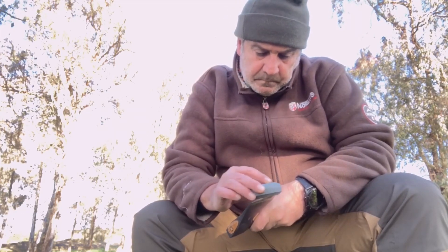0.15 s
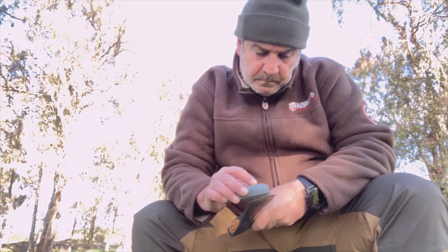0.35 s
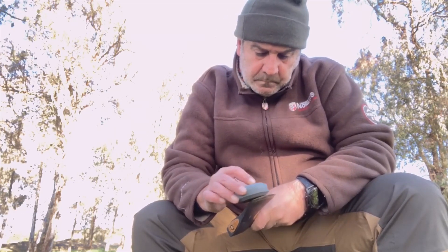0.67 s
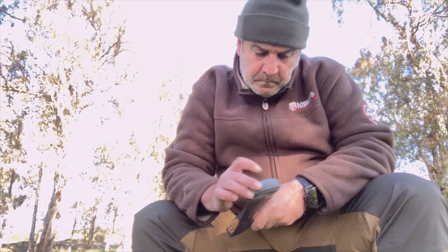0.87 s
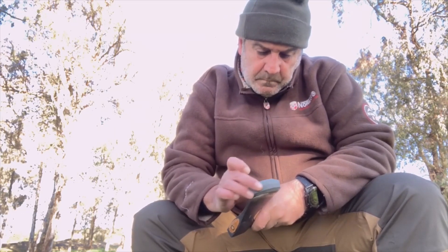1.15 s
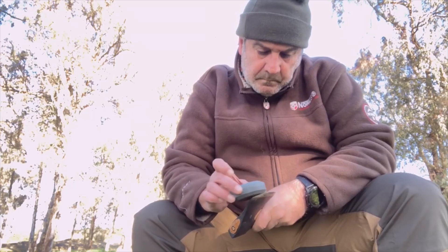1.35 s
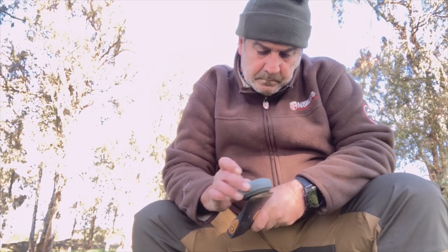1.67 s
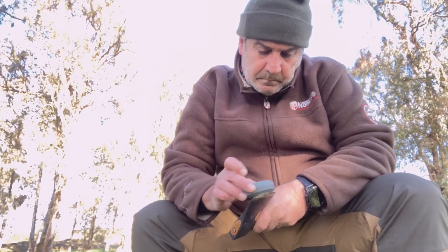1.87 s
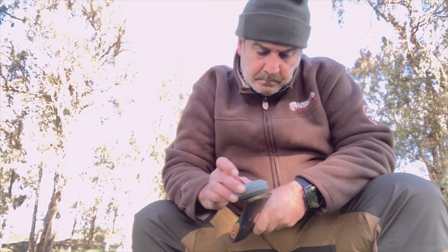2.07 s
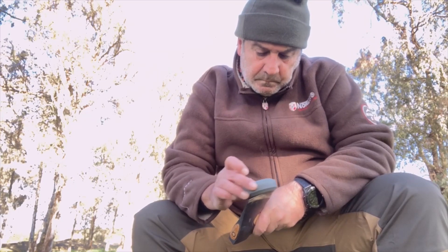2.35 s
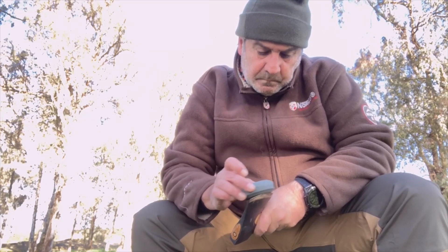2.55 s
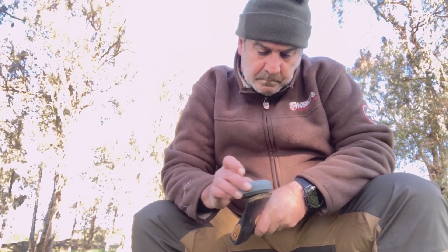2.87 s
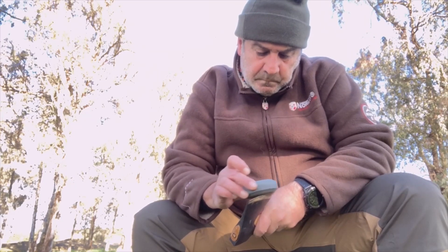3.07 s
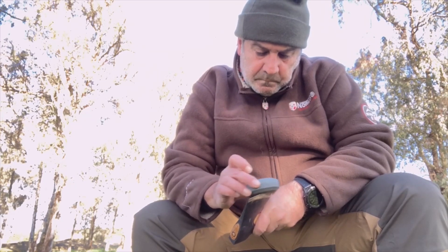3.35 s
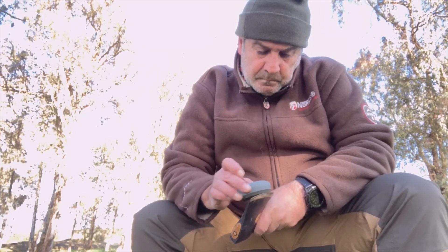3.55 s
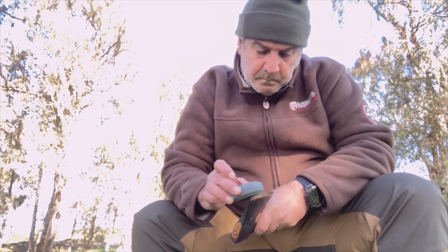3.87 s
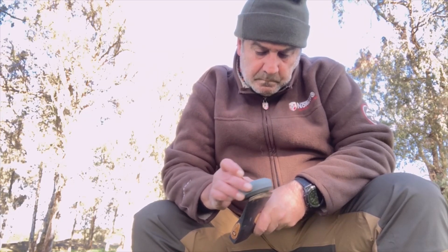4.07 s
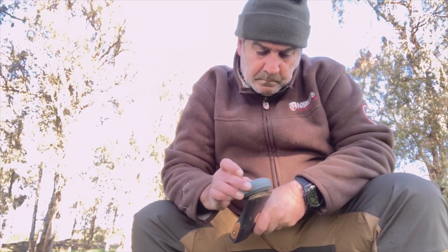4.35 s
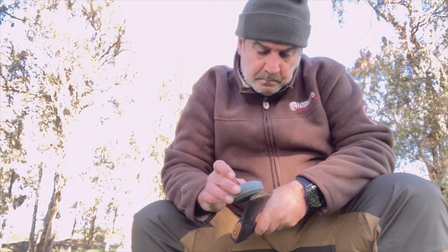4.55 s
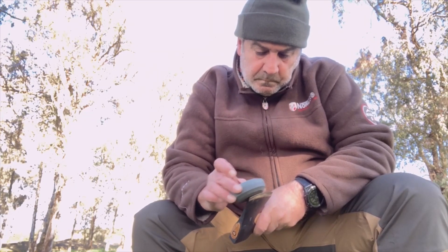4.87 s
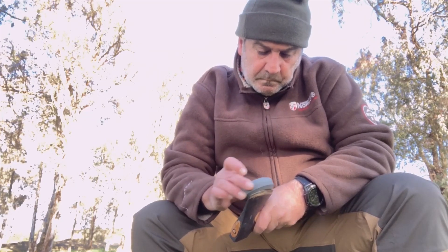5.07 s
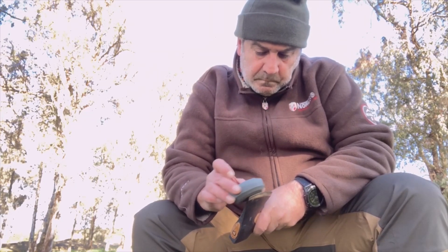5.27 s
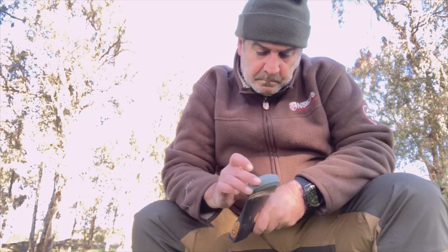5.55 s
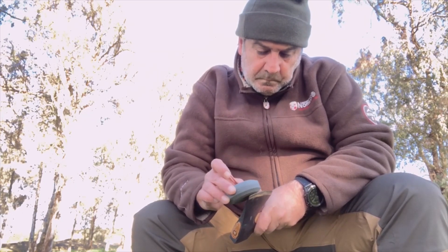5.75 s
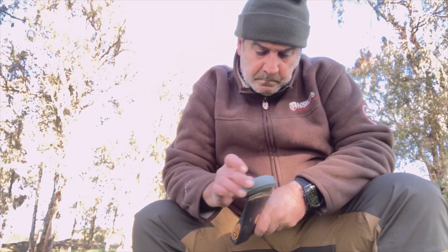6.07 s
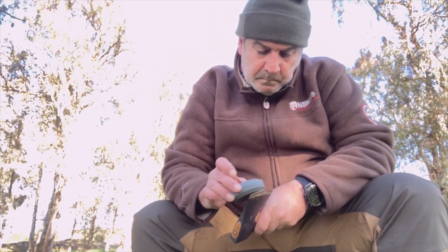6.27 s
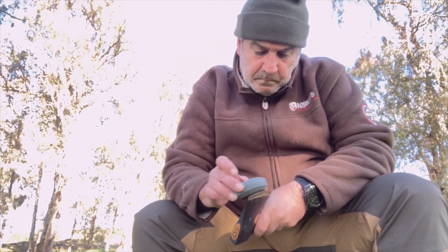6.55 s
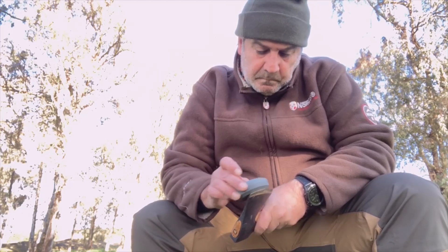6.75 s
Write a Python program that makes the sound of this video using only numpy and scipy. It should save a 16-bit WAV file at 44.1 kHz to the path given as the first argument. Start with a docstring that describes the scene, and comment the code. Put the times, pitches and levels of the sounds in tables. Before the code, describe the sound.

A gritty stone rasps in short, firm circular strokes along a hand-held steel axe blade, with lighter chattering returns, small squeals and faint outdoor wind.

```python
"""A firm gritty rasp comes first: a round stone is worked in circles along an axe blade held on the knee.
Looser returns follow the firm pushes, with creaks, squeals, ticking grains and a little outdoor wind.
Random grit forces catch and slip, and shake resonances of the hand-damped axe head, the stone and the edge.
Wind is coloured noise in puffs, with low bumps; left and right differ in level, phase and fine grain.
All dB levels are relative: each part may be trimmed afterwards, and the stereo stage colours the sum."""
import sys
import numpy as np
from scipy import signal
from scipy.fft import rfft, irfft, next_fast_len
from scipy.io import wavfile
from scipy.ndimage import uniform_filter1d

SR = 44100
rng = np.random.default_rng(int(sys.argv[2]) if len(sys.argv) > 2 else 0)


def unload_wav(signal):
    """Save mono or channel-first audio to the path in sys.argv[1] as 16-bit WAV at rate SR, clipped to [-1, 1]."""
    wavfile.write(
        sys.argv[1],
        SR,
        np.round(np.clip(np.atleast_2d(signal).T, -1, 1) * 32767).astype(np.int16),
    )


N = 304712
TIME = np.arange(N) / SR
STEPS = TIME[::64]  # coarse clock for slow levels


def from_db(db):
    """Turn decibels into gain."""
    return 10 ** (np.asarray(db) / 20)


def rms_one(x):
    """Scale to unit power."""
    return x / np.sqrt(np.mean(x ** 2) + 1e-20)


def over_time(rows, clock=TIME):
    """Join (time [s], value) points with straight lines."""
    s, value = np.transpose(rows)
    return np.interp(clock, s, value)


def at_hz(points, hz):
    """Read a (frequency [Hz], value) curve on a log-frequency axis."""
    f, value = np.transpose(points)
    return np.interp(np.log(hz + 1), np.log(f), value)


def drift(rate):
    """Random wandering of spread 1, with a new target rate times a second."""
    knots = rng.standard_normal(N // 16)
    return rms_one(np.interp(TIME * rate, np.arange(len(knots)), knots))


def coloured(spectrum):
    """Noise with a given spectrum, rms 1."""
    size = next_fast_len(N)
    gain = from_db(at_hz(spectrum, np.fft.rfftfreq(size, 1 / SR)))
    noise = rng.standard_normal(size)
    return rms_one(irfft(rfft(noise) * gain, size)[:N])


def ring(force, modes):
    """Hand-damped resonances side by side: each is a steep band filter shaken by the force."""
    out = 0
    for hz, width, db in modes:
        edges = np.clip([hz - width / 2, hz + width / 2], 20, .45 * SR)
        band = signal.butter(2, edges, "band", fs=SR, output="sos")
        out = out + from_db(db) * signal.sosfilt(band, force + 1e-18)
    return out


def moving_ring(force, hz, width):
    """One resonance whose centre follows a curve: shift it down to zero, low-pass, shift back."""
    turn = np.exp(2j * np.pi * np.cumsum(hz) / SR)
    damping = signal.butter(2, width / 2, fs=SR, output="sos")
    return 2 * np.real(turn * signal.sosfilt(damping, force * turn.conj() + 1e-18))


def at_level(x, db, span_s=0.0431):
    """Hold the short-term level at db while the fast grain stays."""
    power = uniform_filter1d(x * x, int(span_s * SR))
    power = uniform_filter1d(power, int(span_s * SR / 2))
    return from_db(db) * x / np.sqrt(np.abs(power) + 1e-12)


def together(*levels_db):
    """The level of several sounds added by power."""
    return 10 * np.log10(sum(from_db(db) ** 2 for db in levels_db) + 1e-20)


def swell(peak_s, half_s, db):
    """Level in dB of a smooth rise and fall."""
    return db + 20 * np.log10(np.exp(-((STEPS - peak_s) / half_s) ** 2) + 1e-9)


# puffs of wind on the microphone: (peak time [s], half length [s], level [dB])
GUSTS = [(0.056, 0.0304, -61.5), (0.288, 0.028, -65), (1.005, 0.0218, -55.5), (1.105, 0.04, -60.5),
         (1.263, 0.035, -63.5), (1.39, 0.0216, -62.5), (1.56, 0.0786, -48.5), (1.788, 0.102, -54.5),
         (2.499, 0.075, -63), (3.022, 0.014, -60), (3.641, 0.015, -62.5), (4.303, 0.022, -63),
         (5.228, 0.0182, -59.5), (5.417, 0.0213, -63.5), (6.76, 0.0156, -57.5)]
# breeze between the puffs, calmer overall towards the end: (time [s], level [dB])
BREEZE = [(0, -73), (3, -74.5), (6, -80.5), (6.91, -77)]
# spectrum of the wind: (frequency [Hz], level [dB per Hz])
WIND_COLOUR = [(20, -55.5), (38, 0), (55, 5.5), (80, 1), (120, -12.5), (180, -18.5), (300, -53.5)]
# spectrum of the still air: (frequency [Hz], level [dB per Hz])
AIR_COLOUR = [(20, -35), (60, -1.5), (170, -4), (260, -5), (500, -7.5), (1500, -10.5), (4000, -19.5),
              (8000, -53), (15000, -50)]


def outdoors():
    """Soft gusts are low noise shared by both channels, with separate eddies, over steady still-air noise."""
    puffs = [swell(*gust) for gust in GUSTS]
    puffs_db = np.interp(TIME, STEPS, together(*puffs))
    wind_db = together(puffs_db, over_time(BREEZE) + 2.9 * drift(18))
    gusts = at_level(coloured(WIND_COLOUR), wind_db + .5, span_s=0.049)
    eddies = from_db(wind_db - 7.0) * np.array([coloured(WIND_COLOUR), coloured(WIND_COLOUR)])
    separate_air = np.array([coloured(AIR_COLOUR), coloured(AIR_COLOUR)])
    air = coloured(AIR_COLOUR) + from_db(-0.5) * separate_air
    return gusts + eddies + from_db(-71.5) * air


# low bumps of wind on the microphone:
# (time [s], envelope peak [dB], final pitch [Hz], extra pitch at the start [Hz])
BUMPS = [(1.472, -40.5, 55.8, 31.6), (1.531, -45, 80, 24), (1.549, -47, 130, 60), (1.572, -39, 64, 46),
         (1.717, -47.5, 54.7, 34.6), (1.75, -49.5, 70, 30), (1.765, -48.5, 124, 36),
         (1.81, -42.5, 48.5, 37.6), (2.002, -49, 50.1, 35), (2.171, -44.5, 61.3, 105),
         (2.445, -50.5, 45, 24.6), (2.483, -53, 48, 18), (2.547, -47.5, 52, 29)]
BUMP_RISE_CYCLES, BUMP_SINK_S = 0.838, 0.0088


def bumps():
    """Each bump is a sinking sine that swells and dies within a few slow cycles."""
    out = np.zeros(N)
    for s, db, hz, sharp_hz in BUMPS:
        age = np.maximum(STEPS - s, 0)
        rise = age * hz / BUMP_RISE_CYCLES
        envelope = (rise * np.exp(1 - rise)) ** 2
        cycles = hz * age + sharp_hz * BUMP_SINK_S * (1 - np.exp(-age / BUMP_SINK_S))
        out += np.interp(TIME, STEPS, from_db(db) * envelope * np.sin(2 * np.pi * cycles))
    return out


# firm pushes: (start [s], length [s], rasp [dB], thrum [dB], bite on the bevel [dB], fizz [dB],
# weight gained from start to end [dB])
PUSHES = [(0.044, 0.1757, -46.5, -52.5, -58.5, -66, 5.5), (0.403, 0.149, -48.5, -57.5, -55, -63, -5),
          (0.767, 0.1245, -51.5, -59, -63, -75, -3.5), (1.106, 0.1325, -47.5, -54, -56, -67.5, 6.5),
          (1.496, 0.131, -45, -50, -55, -59.5, 1), (1.849, 0.1748, -42.5, -49.5, -56.5, -63.5, -4),
          (2.196, 0.1796, -44.5, -50, -55, -67, 3), (2.548, 0.1987, -43.5, -52, -51, -62, 3.5),
          (2.853, 0.233, -45.5, -50, -52, -61.5, -1.5), (3.193, 0.211, -44.5, -52.5, -54, -64.5, 4),
          (3.559, 0.1713, -42, -50.5, -54, -63.5, 1), (3.928, 0.15, -44, -52, -60, -67, 0),
          (4.303, 0.111, -49, -58.5, -68.5, -64.5, -1.5), (4.609, 0.183, -41.5, -51.5, -55, -66, 0),
          (5.036, 0.139, -44.5, -51, -57, -63, 5), (5.464, 0.1593, -45.5, -51, -55.5, -63, -4),
          (5.849, 0.2187, -43.5, -48, -55.5, -63, 2.5), (6.329, 0.1816, -42, -46.5, -55, -63, -5),
          (6.795, 0.175, -40.5, -49, -53, -61.5, 3.5)]


def pushing(turn_s=0.02, overrun_s=0.0328):
    """1 during a push, 0 otherwise, with soft changes between them."""
    firm = np.zeros(N)
    for start, length, *_ in PUSHES:
        firm += (TIME >= start) & (TIME < start + length + overrun_s)
    return np.clip(uniform_filter1d(firm, int(turn_s * SR)), 0, 1)


SET_DOWN_S = 0.029


def contact_hz(start_hz, end_hz, return_hz):
    """A resonance shifts quickly as the stone is set down and glides as the contact travels along the blade."""
    points = []
    for start, length, *_ in PUSHES:
        points += [(start - SET_DOWN_S, return_hz), (start, start_hz), (start + length, end_hz)]
    return over_time(sorted(points))


def stroke(start, length, db, shape, lean_db=0):
    """Level of one stroke in dB: attack, slope to the middle, slope to the end, release."""
    # the middle is the 0 dB point; attack and release are the times taken by a 20 dB change
    attack_s, start_db, middle, end_db, release_s = shape
    age = STEPS - start
    middle = np.clip(middle, .05, .95)
    held = np.interp(age / length, [0, middle, 1], [start_db - lean_db / 2, 0, end_db + lean_db / 2])
    before = np.maximum(-age, 0) / attack_s
    after = np.maximum(age - length, 0) / release_s
    return db + held - 20 * (before + after)


UNEVEN_PER_S = 24  # the hand's weight is never steady


def played(levels_db, uneven_db):
    """Strokes joined into one level per sample, under a slightly unsteady hand."""
    return np.interp(TIME, STEPS, together(*levels_db)) + uneven_db * drift(UNEVEN_PER_S)


# loose returns between the pushes:
# (start [s], length [s], rasp [dB], stone ring [dB], bite on the bevel [dB])
RETURNS = [(0.0, 0.057, -49, -54, -77), (0.272, 0.0753, -50, -52.5, -73), (0.648, 0.079, -54, -53, -77.5),
           (0.89, 0.0364, -48, -55.5, -67.5), (0.958, 0.1015, -52, -52, -74), (1.284, 0.083, -58, -56, -79),
           (1.651, 0.1085, -57, -55.5, -70), (2.103, 0.126, -48.5, -51, -78.5),
           (2.457, 0.148, -48, -52.5, -72), (2.753, 0.074, -52, -66.5, -63),
           (3.046, 0.0347, -46, -52.5, -62.5), (3.138, 0.0542, -46, -53.5, -56),
           (3.383, 0.08, -43, -51.5, -66.5), (3.773, 0.0823, -45, -53, -64),
           (4.133, 0.074, -45, -53, -63.5), (4.278, 0.0275, -45.5, -59.5, -72.5),
           (4.486, 0.0785, -49, -59.5, -64.5), (4.912, 0.05, -45, -51.5, -66.5),
           (5.26, 0.085, -47, -47.5, -58.5), (5.374, 0.04, -58.5, -53.5, -66.5),
           (5.712, 0.0482, -43.5, -51, -63.5), (5.82, 0.023, -57, -52.5, -72),
           (6.172, 0.117, -49, -53.5, -72), (6.601, 0.1166, -45, -52, -63.5)]
# swell of a return: (attack [s], start [dB], middle [share of stroke], end [dB], release [s])
RETURN_SHAPE = (0.0032, -4, 1, -2.5, 0.0049)


def rubbing(push_levels_db, shape, return_levels_db, rest_db, uneven_db):
    """Level of one part of the axe head: pushes, returns and what is left of the contact at the turns."""
    levels = [rest_db]
    for (start, length, *_, lean_db), db in zip(PUSHES, push_levels_db):
        levels.append(stroke(start, length, db, shape, lean_db))
    for (start, length, *_), db in zip(RETURNS, return_levels_db):
        levels.append(stroke(start, length, db, RETURN_SHAPE))
    return played(levels, uneven_db)


# the stone rides on two spots; the lag between them wanders as the stone rocks
SECOND_SPOT_LAG_S, SECOND_SPOT_SHARE, ROCKING_SPREAD, ROCKS_PER_S = .0028, 0.49, .22, 18


def two_spots(force):
    """Each fracture acts twice with a wandering lag, which mottles the tone and makes it glide."""
    earlier = TIME - SECOND_SPOT_LAG_S * np.exp(ROCKING_SPREAD * drift(ROCKS_PER_S))
    sample = np.clip(earlier * SR, 0, N - 1).astype(int)
    return force + SECOND_SPOT_SHARE * force[:, sample]


def catches(per_s=70, release_s=0.00434):
    """Grains dig in suddenly and let go gradually; mean 0, spread 1."""
    digs = (rng.random(N) < per_s / SR).astype(float)
    hold = signal.lfilter([1], [1, -np.exp(-1 / (release_s * SR))], digs + 1e-18)
    return rms_one(hold - hold.mean())


def grit(slip, grains_per_s, size_db, slip_db, coarse_db=-10, crest=.7):
    """Friction force: many small fractures bunched by slip, and coarse bites at its high crests."""
    # first row: part shared by both channels; second row: unlike part
    fine = np.zeros((2, N))
    born = rng.random((2, N)) < grains_per_s / SR
    count = born.sum()
    sizes = np.minimum(rng.exponential(1, count), 5)
    fine[born] = from_db(size_db * sizes) * rng.choice([-1, 1], count)
    bites = (slip > crest) & (slip > np.roll(slip, 1)) & (slip > np.roll(slip, -1))
    coarse = bites * rng.choice([-1, 1], (2, N))
    force = rms_one(fine) + from_db(coarse_db) * rms_one(coarse)
    return rms_one(two_spots(force * from_db(slip_db * slip)))


def bursts(times, levels_db, decay_s):
    """A short crumbling burst of random-sign force at each time."""
    out = np.zeros((2, N + SR))
    age = np.arange(SR // 25) / SR
    for s, db in zip(times, levels_db):
        start = max(int(s * SR), 0)
        crumbs = rng.choice([-1, 1], (2, len(age)))
        out[:, start:start + len(age)] += from_db(db) * crumbs * np.exp(-age / decay_s)
    return out[:, :N]


# coarse grains snap: (time [s], force peak [dB], top ring against that peak [dB])
SNAPS = [(0.1596, -30, -17.5), (0.3284, -34, -20), (1.5196, -26.5, -26.5), (1.944, -30.5, -13.5),
         (2.0133, -37, -32), (2.1949, -28.5, -15.5), (2.283, -32, -12), (2.4584, -31.5, -30),
         (2.517, -27.5, -26.5), (2.5645, -33, -14.5), (2.412, -33, -31.5), (3.0059, -34, -25.5),
         (3.065, -30, -12), (3.578, -26.5, -24.5), (3.722, -25, -30.5), (4.29, -33.5, -30.5),
         (4.6917, -29, -9), (4.82, -28, -33), (4.8737, -32, -20), (5.118, -32, -17.5), (5.1516, -29, -33),
         (5.561, -29, -22.5), (5.8425, -29.5, -29.5), (6.11, -29, -30), (6.1932, -41, -26),
         (6.543, -28.5, -15.5), (6.8732, -30, -15.5)]
# resonances of a snap: (centre [Hz], width [Hz], level [dB])
SNAP_MODES = [(2905, 94, -3), (4520, 68, -23), (7334, 400, -3), (8960, 400, -.5), (6870, 6400, -17.5)]
# its very high resonances: (centre [Hz], width [Hz], level [dB])
TOP_MODES = [(14265, 450, 0), (12700, 4200, -15)]


def snaps():
    """Single coarse grains break off against the edge: short bursts shake its resonances."""
    s, peak_db, top_db = np.transpose(SNAPS)
    body = ring(bursts(s, peak_db, decay_s=0.00286), SNAP_MODES)
    top = ring(bursts(s, peak_db + top_db, decay_s=0.002), TOP_MODES)
    return from_db(3.5) * body + from_db(13.5) * top


# the eased stone squeals: (start [s], length [s], level [dB])
SQUEALS = [(2.123, 0.0478, -44), (4.569, 0.0286, -56.5), (4.99, 0.0415, -47.5), (5.393, 0.0387, -47),
           (5.797, 0.043, -45.5)]
SQUEAL_START_HZ, SQUEAL_END_HZ, SQUEAL_WIDTH_HZ = 3080, 2832, 51


def squeals():
    """Rough squeals near the stone's lower ring: wavering sines that sink as the weight comes back."""
    sound = np.zeros(N)
    waver_hz = SQUEAL_WIDTH_HZ / 2 * drift(300)
    for start, length, db in SQUEALS:
        span = slice(int(start * SR), int((start + length) * SR))
        size = span.stop - span.start
        hz = np.linspace(SQUEAL_START_HZ, SQUEAL_END_HZ, size) + waver_hz[span]
        tone = np.sin(2 * np.pi * np.cumsum(hz) / SR)
        sound[span] += from_db(db) * np.sqrt(np.hanning(size)) * tone
    roughness = from_db(3.7 * drift(150))
    return sound * roughness * [[1], [0]]  # shared part only


# the stone rings more freely, with ups and downs, as the work gets going: (time [s], level [dB])
STONE_LEVEL = [(0.0, -55.5), (0.6, -56.5), (1.2, -60), (1.8, -54), (2.5, -56), (3.2, -58), (3.8, -49.5),
               (4.6, -51.5), (5.4, -51), (6.2, -52.5), (6.91, -53)]
# where the stone touches decides which ring is louder: (time [s], upper ring against lower [dB])
GRIP = [(0.0, -9.5), (.9, -0.5), (1.7, 5), (2.15, -6.5), (2.5, -11), (2.9, -4.5), (3.5, -12), (3.8, 4),
        (3.9, -12.5), (4.1, 3), (4.9, 0), (5.3, 9), (5.42, -0.5), (5.55, 2), (5.65, 5), (5.82, -1),
        (6.0, 0), (6.8, -1.5)]
# the lower ring shifts with the hold of the fingers: (time [s], pitch [Hz])
STONE_PITCH = [(0, 2865), (.7, 2908), (1.1, 2890), (1.4, 2836), (6.91, 2845)]
# broad skirt of the lower ring: (centre [Hz], width [Hz], level [dB])
STONE_MODES = [(2886, 352, -5)]
# upper ring: (centre [Hz], width [Hz], level [dB])
UPPER_STONE_MODES = [(3452, 290.5, -1.62)]
# swell in a push: (attack [s], start [dB], middle [share of stroke], end [dB], release [s])
STONE_SHAPE = (0.1437, 3.5, 0.07, -8, 0.83)
# the lower ring goes sharp while the stone is eased off just before a push
STONE_WIDTH_HZ, EASED_RISE_HZ, EASE_S = 98, 127, 0.0657
REST_STONE_DB = -3  # at the turns, against STONE_LEVEL


def stone(slip, wander_db=6.5):
    """Grit shakes the stone's own two rings, which last through the turns and trade strength as it rocks."""
    free_db = over_time(STONE_LEVEL, STEPS)
    pushes = [stroke(start, length, free_db, STONE_SHAPE) for start, length, *_ in PUSHES]
    returns = [stroke(start, length, db, RETURN_SHAPE) for start, length, _, db, _ in RETURNS]
    slide_db = played(pushes + returns + [free_db + REST_STONE_DB], uneven_db=1.62)
    eased = 0
    for start, *_ in PUSHES:
        eased = eased + np.maximum(1 - np.abs(STEPS - start + EASE_S) / EASE_S, 0)
    lower_hz = over_time(STONE_PITCH) + EASED_RISE_HZ * np.interp(TIME, STEPS, eased)
    force = grit(slip, grains_per_s=5000, size_db=4.0, slip_db=1.5)
    lower = moving_ring(force, lower_hz, STONE_WIDTH_HZ) + ring(force, STONE_MODES)
    upper_db = over_time(GRIP) + wander_db * drift(16)
    upper = from_db(upper_db) * ring(force, UPPER_STONE_MODES)
    return at_level(lower + upper, slide_db + 1.5)


# the stone runs over the thin edge: (peak time [s], half length [s], lower ring [dB], upper ring [dB])
CROSSINGS = [(0.065, 0.075, -56, -62), (0.405, 0.0306, -55, -59), (0.534, 0.051, -58, -62),
             (0.778, 0.075, -62, -66.5), (1.109, 0.047, -56, -58.5), (1.249, 0.062, -69, -60),
             (1.594, 0.097, -64.5, -59), (1.868, 0.0328, -54, -57), (2.008, 0.0564, -52, -47.5),
             (2.165, 0.097, -60, -54.5), (2.344, 0.0555, -58.5, -54), (2.526, 0.042, -63, -53),
             (2.695, 0.063, -59.5, -58.5), (3.017, .05, -69.5, -53.5), (3.369, 0.0554, -53.5, -54),
             (3.575, 0.044, -56, -52), (3.71, 0.0574, -53, -52.5), (3.856, 0.065, -73.5, -64),
             (3.96, 0.0434, -57.5, -53), (4.05, 0.0616, -55, -56.5), (4.305, 0.0182, -59, -50.5),
             (4.392, 0.087, -60, -55), (4.623, 0.0455, -54, -51), (4.795, 0.0754, -51, -54.5),
             (5.042, 0.048, -53.5, -52), (5.179, 0.0617, -53.5, -52), (5.444, 0.069, -58, -56),
             (5.618, 0.053, -47.5, -47), (5.853, 0.0497, -60.5, -49.5), (6.037, 0.094, -53.5, -52),
             (6.293, 0.0696, -61.5, -50), (6.487, 0.105, -52.5, -51), (6.841, 0.095, -67, -56.5)]
# a patch of grit digs in and crumbles: (peak time [s], half length [s], bite [dB], fizz [dB])
CRUNCHES = [(1.452, .01, -72.5, -62), (1.522, 0.0106, -47.5, -59), (1.686, 0.0084, -67, -62),
            (2.203, 0.033, -61.5, -56), (2.841, .012, -55.5, -58), (2.974, 0.0075, -61.5, -62),
            (3.065, 0.0061, -44, -56.5), (3.115, 0.0076, -53.5, -60), (3.329, .01, -55, -63),
            (3.358, .02, -46, -59.5), (3.613, .01, -53.5, -56.5), (3.985, .025, -63.5, -62.5),
            (4.044, 0.0107, -66, -66), (4.189, 0.013, -54, -70), (4.761, 0.038, -49, -62),
            (5.332, 0.0275, -63, -70), (5.89, 0.0147, -49, -53.5), (6.005, 0.0294, -46.5, -53),
            (6.208, .012, -62, -63), (6.408, 0.016, -48.5, -56)]
# the edge's lower ring: (centre [Hz], width [Hz], level [dB])
LOWER_EDGE_MODES = [(7292, 146, 1.5), (7413, 793, -2.5), (7332, 1640, -14.5)]
# the edge's upper ring: (centre [Hz], width [Hz], level [dB])
UPPER_EDGE_MODES = [(9006.6, 136, -0.5), (8900, 473, -6), (9280, 710, -15)]
# the bevel: (centre [Hz], width [Hz], level [dB])
BEVEL_MODES = [(3995, 136, -4), (4464, 307, 0), (4807, 1130, -11.5)]
# the finest fractures: (centre [Hz], width [Hz], level [dB])
FIZZ_MODES = [(11980, 8500, -11), (12800, 1270, -9.5), (14115, 246, 3), (14700, 260, -20.5)]
# swell in a push: (attack [s], start [dB], middle [share of stroke], end [dB], release [s])
BITE_SHAPE = (0.01, -1, 0.8145, -9, 0.0981)
REST_BITE_DB, REST_FIZZ_DB, REST_EDGE_DB = -75, -78, -67  # what is left at the turns
EDGE_FOLLOWS_DB, RETURN_FIZZ_DB = -8, -7.5  # edge, and fizz on a return, against the bite


def cutting_edge(slip, wander_db=1.67):
    """Grit bites the bevel, fizzes and makes the thin edge sing on two rings, each with its own level."""
    *_, push_bite_db, push_fizz_db, _ = np.transpose(PUSHES)
    *_, return_bite_db = np.transpose(RETURNS)
    return_fizz_db = return_bite_db + RETURN_FIZZ_DB
    bite_db = rubbing(push_bite_db, BITE_SHAPE, return_bite_db, REST_BITE_DB, uneven_db=1.59)
    fizz_db = rubbing(push_fizz_db, BITE_SHAPE, return_fizz_db, REST_FIZZ_DB, uneven_db=1.46)
    force = grit(slip, grains_per_s=5000, size_db=3.5, slip_db=1.5)
    edge = 0
    for column, modes in enumerate((LOWER_EDGE_MODES, UPPER_EDGE_MODES)):
        crossings = [swell(s, half_s, rings_db[column]) for s, half_s, *rings_db in CROSSINGS]
        sing_db = played(crossings + [REST_EDGE_DB], uneven_db=2.5354)
        rings = sum(ring(force, [mode]) * from_db(wander_db * drift(14)) for mode in modes)
        edge = edge + at_level(rings, together(sing_db, bite_db + EDGE_FOLLOWS_DB))
    crunch_bites = [swell(s, half_s, db) for s, half_s, db, _ in CRUNCHES]
    crunch_fizzes = [swell(s, half_s, db) for s, half_s, _, db in CRUNCHES]
    bite_db = together(bite_db, played(crunch_bites, uneven_db=0.0))
    fizz_db = together(fizz_db, played(crunch_fizzes, uneven_db=2.0))
    bite = at_level(ring(force, BEVEL_MODES), bite_db + 4.0)
    fizz = ring(grit(slip, grains_per_s=7000, size_db=4.0, slip_db=1.5), FIZZ_MODES)
    return bite + edge + at_level(fizz, fizz_db + 0.26)


# at slow turns the stone sticks and slips regularly:
# (start [s], end [s], first slip rate [Hz], middle slip rate [Hz], last slip rate [Hz], level [dB])
CREAKS = [(0.247, 0.28, 489, 471.4, 470, -51), (0.659, 0.694, 635, 616.6, 590, -55.5),
          (0.702, 0.735, 578, 594.6, 650, -54), (.74, 0.799, 855, 750, 597, -60),
          (0.889, 0.927, 579, 493.6, 560, -52.5), (0.996, 1.02, 555, 618, 610, -50.5),
          (1.029, 1.094, 776, 545, 479, -52.5), (1.411, 1.442, 564, 575.2, 630, -51.5),
          (4.04, 4.099, 557.7, 527.8, 470, -59.5), (4.208, 4.263, 535.3, 610.2, 631, -49),
          (4.256, 4.297, 592, 496.8, 458, -51), (4.8, 4.825, 529, 497.4, 478, -47),
          (5.165, 5.201, 498, 486, 478, -58), (5.236, 5.259, 461, 484, 523, -54.5),
          (5.755, 5.788, 619, 607, 594, -50.5), (6.698, 6.766, 489, 509.7, 532, -53.5)]
# what a creak rings: (centre [Hz], width [Hz], level [dB])
CREAK_MODES = [(550, 218, 2.5), (1195, 102, 6), (1505, 1510, -6.5)]


def creaks(jitter=0.0193):
    """Regular slips at a gliding rate tap the resonances; also returns how firmly the stone sticks, 0-1."""
    sound, stuck = np.zeros(N), np.zeros(N)
    for start, end, *rates_hz, db in CREAKS:
        span = slice(int(start * SR), int(max(end, start + .01) * SR))
        size = span.stop - span.start
        progress = np.linspace(0, 1, size)
        waver = np.interp(progress, np.linspace(0, 1, 10), rng.standard_normal(10))
        rate_hz = np.interp(progress, [0, .5, 1], rates_hz)
        cycles = np.cumsum(rate_hz * (1 + jitter * waver)) / SR
        slips = np.diff(np.floor(cycles), prepend=0)  # one tap per whole cycle
        grip = np.sqrt(np.hanning(size))
        sound[span] += from_db(db) * grip * rms_one(ring(slips, CREAK_MODES))
        stuck[span] = grip
    return sound * [[1], [0]], stuck  # shared part only


# on a return the loose stone skips along the steel in a quick, wandering patter
SKIPS_PER_S, SKIP_SPREAD, SKIP_DB = 215, .22, -1


def skips():
    """Nearly regular taps whose strength wanders; rms 1."""
    cycles = np.cumsum(SKIPS_PER_S * np.exp(SKIP_SPREAD * drift(22))) / SR
    strength = from_db(4.53 * drift(30) + 1.8 * drift(300))
    taps = np.diff(np.floor(cycles), prepend=0) * strength
    return rms_one(taps * [np.ones(N), rng.choice([-1, 1], N)])


# low ring of the head: (centre [Hz], width [Hz], level [dB])
THRUM_MODES = [(764.8, 283.4, -0.5)]
# swell of the low ring in a push:
# (attack [s], start [dB], middle [share of stroke], end [dB], release [s])
THRUM_SHAPE = (0.1229, -9.5, -0.05, -8, 0.11)
# swell of the deepest ring in a push:
# (attack [s], start [dB], middle [share of stroke], end [dB], release [s])
DEEP_SHAPE = (0.56, -19, 0.3, -3.5, 0.12)
# the deepest ring rises in pitch during a push
DEEP_START_HZ, DEEP_END_HZ, DEEP_RETURN_HZ, DEEP_WIDTH_HZ = 472, 513.9, 491.5, 108.4
RETURN_THRUM_DB, RETURN_DEEP_DB = -5.5, -10.5  # a return against its own rasp
REST_THRUM_DB, REST_DEEP_DB = -63, -78.5
RADIATION_HZ = 316.7  # the head radiates little below its deepest ring


def thrum(slip):
    """The drag of the stone stirs the low rings of the head in lumps; the deepest has its own swell."""
    _, _, _, push_db, *_ = np.transpose(PUSHES)
    _, _, return_db, *_ = np.transpose(RETURNS)
    thrum_db = rubbing(push_db, THRUM_SHAPE, return_db + RETURN_THRUM_DB, REST_THRUM_DB, uneven_db=1.53)
    deep_db = rubbing(push_db, DEEP_SHAPE, return_db + RETURN_DEEP_DB, REST_DEEP_DB, uneven_db=2.66)
    drag = grit(slip, grains_per_s=6000, size_db=1.97, slip_db=0.98, coarse_db=-9)
    radiation = signal.butter(4, RADIATION_HZ, "high", fs=SR, output="sos")
    drag = signal.sosfilt(radiation, drag)
    deep_hz = contact_hz(DEEP_START_HZ, DEEP_END_HZ, DEEP_RETURN_HZ)
    deep = moving_ring(drag, deep_hz, DEEP_WIDTH_HZ)
    return at_level(ring(drag, THRUM_MODES), thrum_db - 4.5) + at_level(deep, deep_db - 1)


# the stone judders on the steel: (time [s], force peak [dB])
JUDDERS = [(0.132, -26), (0.285, -27.5), (0.4045, -27), (0.478, -28), (0.7, -46), (0.822, -31.5),
           (1.0702, -30.5), (1.152, -30.5), (1.29, -35), (1.352, -37), (1.5, -36.5), (1.8426, -31.5),
           (1.944, -30), (2.194, -36), (2.23, -30.5), (2.4678, -33.5), (2.5486, -26), (2.59, -24.5),
           (2.738, -30.5), (2.8833, -26.5), (2.9387, -28), (2.9704, -27.5), (3.068, -33), (3.1073, -33.5),
           (3.1393, -31.5), (3.2146, -29), (3.3855, -30), (3.447, -35.5), (3.566, -32), (3.6077, -30),
           (3.6385, -23.5), (3.829, -33), (3.9247, -31), (3.97, -32), (3.995, -25), (4.155, -33),
           (4.187, -28), (4.29, -31.5), (4.555, -37), (4.6184, -35), (4.6585, -28), (4.7328, -24),
           (4.8726, -29.5), (5.079, -37.5), (5.3204, -30.5), (5.4714, -31), (5.538, -27), (5.8562, -25.5),
           (5.958, -27.5), (6.3264, -24.5), (6.4161, -23.5), (6.6557, -29.5), (6.793, -33), (6.859, -22),
           (6.894, -27)]
# higher rings of a push, before their glide: (centre [Hz], width [Hz], level [dB])
PUSH_MODES = [(1697, 138, -13.5), (2173.3, 186.4, -8), (2070.4, 440, -18.5), (3403, 142, -12)]
# higher rings of a return: (centre [Hz], width [Hz], level [dB])
RETURN_MODES = [(1516.5, 351, -8), (2137, 67, -11), (1877, 950, -8.5), (3480.2, 143, -5), (4324, 73, -15)]
# swell in a push: (attack [s], start [dB], middle [share of stroke], end [dB], release [s])
RASP_SHAPE = (0.1577, -2.5, 0.2841, -6, 0.324)
REST_RASP_DB = -68
# the main ring sinks along the blade; weight on the stone then raises these pitches
PUSH_START_HZ, PUSH_END_HZ, RETURN_HZ, PRESS_HZ_PER_DB = 1325, 1261, 1250, 4.5
MAIN_WIDTH_HZ, LIGHT_WIDTH_HZ = 144.8, 118.3  # under a heavy and a light stone
GLIDE_SHARE = 0.443  # exponent of the main ring's pitch ratio that the higher rings follow


def axe_head(slip, stuck_db=-7, damping_db=-48, damping_range_db=1.0):
    """Grit shakes the head: focused in a push, broad and chattery on a return, weaker while it creaks."""
    _, _, push_rasp_db, *_ = np.transpose(PUSHES)
    _, _, return_rasp_db, *_ = np.transpose(RETURNS)
    rasp_db = rubbing(push_rasp_db, RASP_SHAPE, return_rasp_db, REST_RASP_DB, uneven_db=0.9673)
    firm = pushing()
    main_hz = contact_hz(PUSH_START_HZ, PUSH_END_HZ, RETURN_HZ)
    main_hz = main_hz + PRESS_HZ_PER_DB * (rasp_db - damping_db)
    creak, stuck = creaks()
    # a heavy stone damps the steel and widens its main ring; a light one lets it ring
    heavy = .5 + .5 * np.tanh((rasp_db - damping_db) / damping_range_db)
    push = firm * grit(slip, grains_per_s=3500, size_db=3.0, slip_db=0.69, coarse_db=-9)
    loose = grit(slip, grains_per_s=3000, size_db=3.5, slip_db=2.0, coarse_db=-4)
    back = (1 - firm) * rms_one(loose + from_db(SKIP_DB) * skips())
    force = push + back
    main = moving_ring(heavy * force, main_hz, MAIN_WIDTH_HZ)
    main += from_db(0.5) * moving_ring((1 - heavy) * force, main_hz, LIGHT_WIDTH_HZ)
    # the higher rings of a push glide along with the main one
    glide = (main_hz / PUSH_START_HZ) ** GLIDE_SHARE
    higher = sum(from_db(db) * moving_ring(push, hz * glide, width) for hz, width, db in PUSH_MODES)
    rasp = main + higher + ring(back, RETURN_MODES)
    s, peak_db = np.transpose(JUDDERS)
    knocks = bursts(s, peak_db, decay_s=0.0103)
    judder = moving_ring(knocks, main_hz, MAIN_WIDTH_HZ)
    judder += ring(firm * knocks, PUSH_MODES)
    judder += from_db(-1) * ring((1 - firm) * knocks, RETURN_MODES)
    judder += from_db(-11.5) * ring(knocks, THRUM_MODES)
    sliding = at_level(rasp, rasp_db + 0.526) + thrum(slip)
    return sliding * from_db(stuck_db * stuck) + creak + from_db(8.0) * judder


# the stone's contact changes, mostly a lift off the steel: (start [s], end [s], change of level [dB])
LIFTS = [(0.213, 0.238, -6), (0.376, 0.395, -4.5), (0.568, 0.618, -1.5), (0.933, .96, 0.5),
         (1.444, 1.495, -13), (1.761, 1.843, -11), (2.784, 2.801, -3.5), (3.163, 3.205, -4),
         (3.526, 3.545, -5.5), (3.863, 3.919, -5.5), (4.899, 4.913, -3), (5.345, 5.387, 0.5),
         (5.434, 5.468, -5.5), (5.793, 5.811, -4.5), (6.299, 6.33, -2.5), (6.721, 6.775, -3)]


def touching(ease_s=0.0064):
    """Gain of the contact: 1 normally, mostly less during the listed lifts."""
    lift_db = np.zeros(N)
    for start, end, db in LIFTS:
        lift_db += db * ((TIME >= start) & (TIME < end))
    return from_db(uniform_filter1d(lift_db, int(ease_s * SR)))


# level between the channels: (frequency [Hz], left minus right [dB])
TILT = [(60, 2.5), (92, 6), (140, 13), (210, -14), (330, 0), (500, -2.0), (770, -5.5), (1170, -3),
        (1790, -8), (2740, -1), (4190, -7), (6410, -1.5), (9810, 0.5), (15000, -0.5)]
# phase between the channels: (frequency [Hz], lead of the left [radians])
LEAD = [(100, 0), (750, -.6), (1200, 0), (1700, -.2), (2150, -2), (2550, -2.7), (2880, -1), (3350, -2.4),
        (5400, -3), (6500, -.3), (8000, 0)]
# unlike part of the two channels against the shared part: (frequency [Hz], level [dB])
UNLIKE = [(100, -16), (500, -14), (1300, -13), (2200, -9.5), (3000, -6), (4400, -2.5), (7200, -13.5),
          (8500, -24), (15000, -15.5)]


def microphones(x):
    """Two channels with their own level and phase; the unlike part enters them with opposite signs."""
    size = next_fast_len(N + SR // 10)
    hz = np.fft.rfftfreq(size, 1 / SR)
    side = np.array([[1], [-1]])
    shared, unlike = rfft(x, size)
    share = from_db(at_hz(UNLIKE, hz))
    mixed = (shared + side * share * unlike) / np.sqrt(1 + share ** 2)
    channels = from_db(side * at_hz(TILT, hz) / 2) * np.exp(1j * side * at_hz(LEAD, hz) / 2)
    return irfft(channels * mixed, size)[:, :N]


def scene():
    """One catch-and-slip motion drives the grit on the steel and the stone; wind is added at the end."""
    slip = rms_one(drift(70) + .4 * drift(260) + .4 * catches())
    scrape = touching() * (axe_head(slip) + stone(slip)) + cutting_edge(slip)
    return microphones(scrape + squeals() + snaps()) + outdoors() + bumps()


CUTOFF_HZ = 15600


def record(dry):
    """Cut the top steeply with a low-pass filter."""
    low_pass = signal.ellip(10, .1, 80, CUTOFF_HZ, fs=SR, output="sos")
    return signal.sosfilt(low_pass, dry)


dry = scene()
out = record(dry)
unload_wav(out)
```